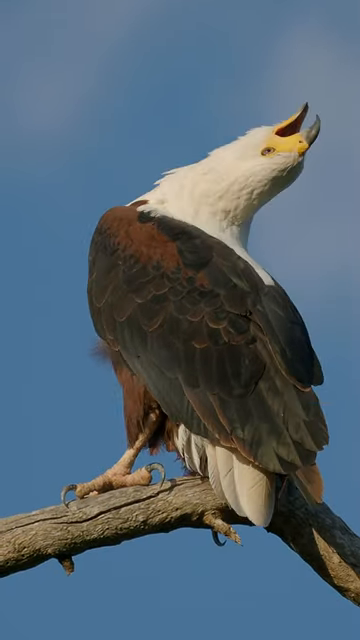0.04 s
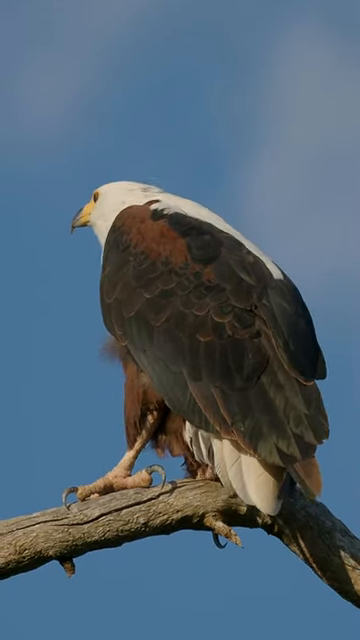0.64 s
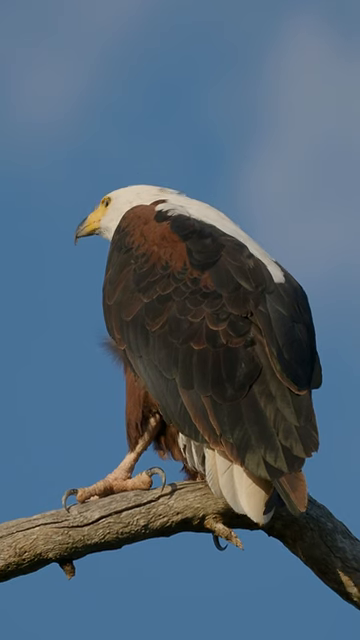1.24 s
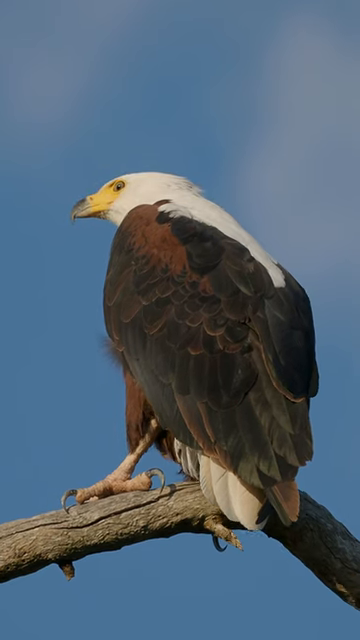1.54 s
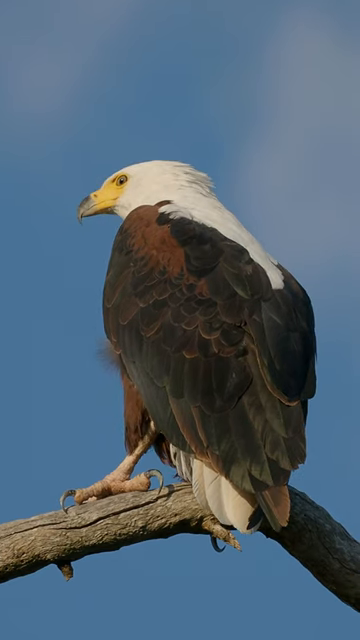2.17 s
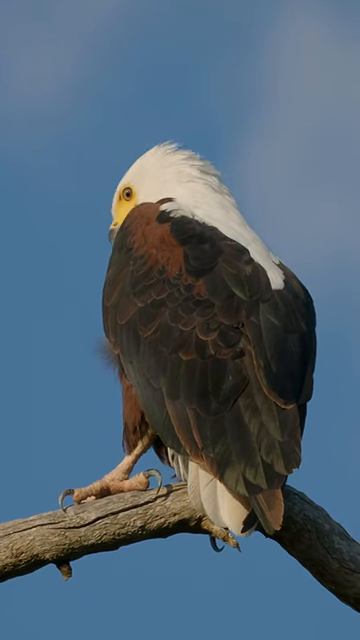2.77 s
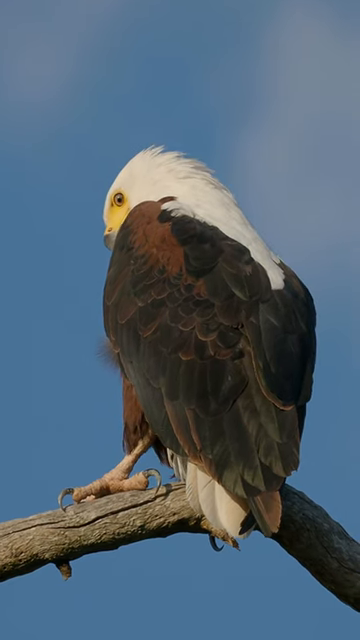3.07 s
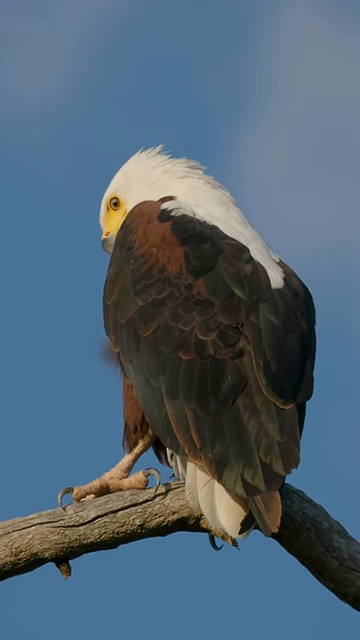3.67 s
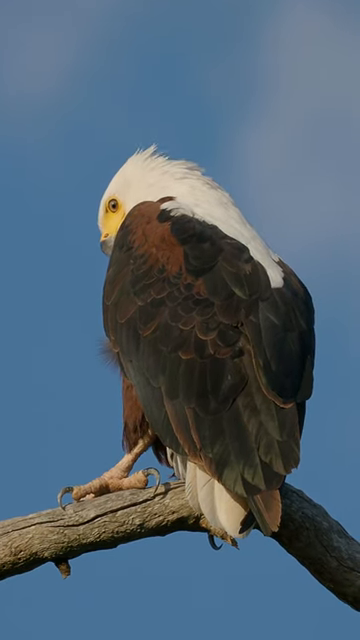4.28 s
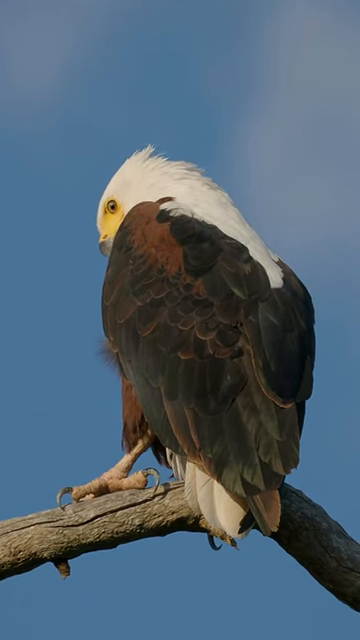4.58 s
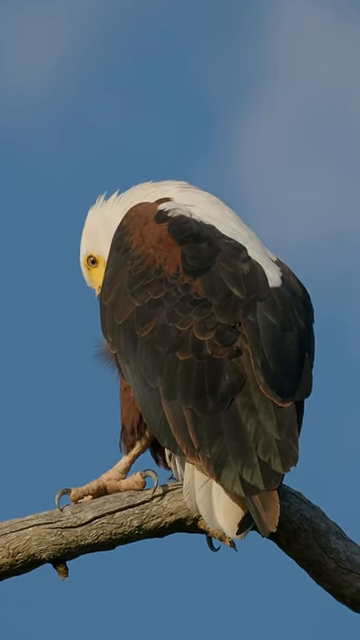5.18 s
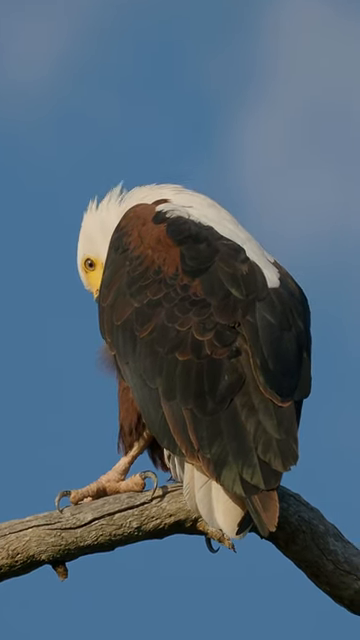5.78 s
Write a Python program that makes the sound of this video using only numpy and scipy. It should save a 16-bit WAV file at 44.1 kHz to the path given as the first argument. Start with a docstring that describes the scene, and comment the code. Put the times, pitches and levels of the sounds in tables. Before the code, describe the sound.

One loud, echoing eagle yelp and fast high chirping, followed by distant whistles and buzzy bird notes over shrill insects.

```python
"""A small bird nearby repeats a sharp two-part chirp about eight times a second, over shrill insects,
the faint hush of open air and the fading echo of an eagle's call. Almost at once the fish eagle throws
back its head and gives one loud yelp, which overloads the microphone and dies away among the trees.
As the chirping ends, a farther bird follows with three rising whistles and a row of buzzy notes.
The voices are gliding tones that scatter off trunks and leaves; insects and air are filtered noise."""
import sys
import numpy as np
from scipy import signal
from scipy.fft import rfft, irfft
from scipy.io import wavfile

SR = 44100
rng = np.random.default_rng(int(sys.argv[2]) if len(sys.argv) > 2 else 0)


def pcm_store(signal):
    """Save signal as 16-bit PCM."""
    levels = np.round(np.clip(np.atleast_2d(signal), -1, 1) * 32767)
    wavfile.write(sys.argv[1], SR, levels.astype(np.int16).T)


N = 261072
T = np.arange(N) / SR


def from_db(db):
    """Turn decibels into a number to multiply a sound by."""
    return 10 ** (np.asarray(db) / 20)


def rms_one(x):
    """Scale a sound so that its average power is 1."""
    return x / np.sqrt(np.mean(x ** 2) + 1e-20)


def along(rows, at):
    """Look up places in a table's first column and read the other columns, blending between rows."""
    first, *columns = np.transpose(rows)
    return [np.interp(at, first, column) for column in columns]


def band(x, low_hz, high_hz):
    """Keep mainly the sound between two frequencies."""
    edges_hz = [low_hz, min(high_hz, .48 * SR)]
    return signal.sosfilt(signal.butter(2, edges_hz, "band", fs=SR, output="sos"), x)


def drift(rate_hz):
    """A smooth random wander, about 1 in size; a higher rate wanders faster."""
    r = np.exp(-2 * np.pi * rate_hz / SR)
    return rms_one(signal.lfilter([1], [1, -2 * r, r * r], rng.standard_normal(N + SR))[SR:])


def tremor(count):
    """The unsteadiness of a small bird's voice, changing about every millisecond."""
    points = rng.standard_normal(count // 40 + 2)
    return np.interp(np.arange(count) / 40, np.arange(len(points)), points)


def sine(hz):
    """A pure tone of power 1 that follows a changing pitch."""
    return np.sqrt(2) * np.sin(2 * np.pi * np.cumsum(hz) / SR)


def two_ears(common, opposite, alike):
    """Mix two noises into left and right; alike runs from 0 (unrelated) to 1 (the same)."""
    return np.sqrt(1 + alike) * common + np.sqrt(1 - alike) * opposite * [[1], [-1]]


def stereo_noise(spectrum):
    """Noise shaped by (frequency [Hz], level [dB]) rows; the ears differ most in the treble."""
    # how alike the two ears are: (frequency [Hz], likeness [0 to 1])
    likeness = [(30, 1), (100, .2), (250, 0.9), (600, 0.4), (1500, 0.56), (3000, 0.17), (8000, 0),
                (16000, 0)]
    log_hz = np.log(np.fft.rfftfreq(N, 1 / SR) + 1)
    level_db, = along([(np.log(hz), db) for hz, db in spectrum], log_hz)
    alike, = along([(np.log(hz), share) for hz, share in likeness], log_hz)
    below = np.maximum(np.log(spectrum[0][0]) - log_hz, 0)
    above = np.maximum(log_hz - np.log(spectrum[-1][0]), 0)
    common, opposite = rfft(rng.standard_normal((2, N))) * from_db(level_db - 60 * (below + above))
    return rms_one(irfft(two_ears(common, opposite, alike), N))


def place(x, pan_db, lag_ms):
    """Give a sound a direction: a positive pan is louder on the left, a positive lag later on the right."""
    delay = np.exp(-2j * np.pi * np.fft.rfftfreq(N, 1 / SR) * lag_ms / 1000)
    right = irfft(rfft(x) * delay, N)
    return np.array([x * from_db(pan_db / 2), right * from_db(-pan_db / 2)])


def trees(x, fade_s, alike, build_s):
    """Trunks and leaves scatter a sound into a tail that builds up, then drops 60 dB in fade_s."""
    t = T[:SR * 2]
    build_up = 1 - np.exp(-(t / build_s) ** 2)
    common, opposite = rng.standard_normal((2, len(t))) * from_db(-60 * t / fade_s) * build_up
    tail = rms_one(two_ears(common, opposite, alike)) / np.sqrt(len(t))
    return signal.fftconvolve(x[None], tail, axes=1)[:, :N]


def chirp_train():
    """The chirps slow down and drop a little in pitch; gives each one's start, pitch and two levels."""
    # how hard the bird sings: (time [s], level [dB])
    effort = [(0, -19.5), (.35, -16), (.75, -15.5), (1.2, -19.5), (2.0, -19), (2.25, -17.5)]
    gap_s, gap_growth_s = .11621, .000232
    k = np.arange(20)
    start_s = .0052 + gap_s * k + gap_growth_s * k * (k - 1) / 2
    hz = 7083 - 62 * start_s
    pip_db, = along(effort, start_s)
    swoop_db = -18 + .55 * (pip_db - pip_db.mean())  # the swoop only partly follows the effort
    return np.transpose([start_s, hz, pip_db, swoop_db])


def chirp_part(shape, start_s, hz, db, rough):
    """One whistled sweep, sung from a set pattern with slight changes and a fast tremble."""
    out = np.zeros(N)
    at = np.flatnonzero((T > start_s + shape[0][0]) & (T < start_s + shape[-1][0]))
    share, level_db = along(shape, T[at] - start_s)
    pitch = hz * share * (1 + rng.normal(0, .0038) + rough * tremor(len(at)))
    out[at] = from_db(db + level_db) * (sine(pitch) + from_db(-34) * sine(2 * pitch))
    return out


def near_bird():
    """A soft tick, a high pip that plunges with a thin rasp, then a rising swoop, over and over."""
    # the four parts of a chirp: (time from its start [s], pitch [share of the chirp's], level [dB])
    tick = [(-.025, .44, -42), (-.0225, .5, -31), (-.02, .49, -27.5), (-.018, .42, -22),
            (-.015, .35, -26.5), (-.011, .34, -41)]
    pip = [(-.0012, .87, -24), (-.0003, .94, -6), (.002, .99, -1), (.0064, 1.008, 0), (.010, 1.02, -12),
           (.0123, 1.005, -1), (.0135, .78, .5), (.0147, .56, -17), (.0175, .38, -38)]
    rasp = [(.003, 1.05, -42), (.0105, 1.13, -20), (.013, 1.17, -25), (.016, 1.06, -21), (.021, 1.1, -24),
            (.034, 1.08, -37)]
    swoop = [(.016, .43, -35), (.018, .57, -19), (.0197, .72, -4.5), (.0225, .745, -1), (.0275, .782, 1.8),
             (.031, .808, -2), (.034, .82, -10), (.038, .82, -35)]
    chirps = chirp_train()
    pips = sum(chirp_part(pip, s, hz, db, rough=.004) for s, hz, db, _ in chirps)
    swoops = sum(chirp_part(swoop, s + rng.normal(0, .0004), hz, db, rough=.006)
                 for s, hz, _, db in chirps)
    rasps = sum(chirp_part(rasp, s, hz, db, rough=.045) for s, hz, db, _ in chirps)
    ticks = sum(chirp_part(tick, s, hz, db=rng.normal(-17.5, 1.5), rough=.15) for s, hz, _, _ in chirps)
    direct = from_db(-2.5) * place(pips, pan_db=-9.5, lag_ms=.057)
    direct += from_db(2.5) * place(swoops, pan_db=-1.4, lag_ms=.058)
    # the harsh parts blur into scratches among the nearest leaves
    scratches = trees(ticks, fade_s=.018, alike=.25, build_s=.001)
    scratches += from_db(-5.5) * trees(rasps, fade_s=.012, alike=.11, build_s=.001)
    song = pips + swoops + ticks + rasps
    leaves = from_db(-6) * trees(song, fade_s=.08, alike=.1, build_s=.006)
    woods = from_db(-18) * trees(song, fade_s=.64, alike=.1, build_s=.02)
    return direct + scratches + leaves + woods


def shrill(hz, width_hz):
    """Noise squeezed into a band so narrow that it becomes a wavering tone, different in each ear."""
    low_hz, high_hz = hz - width_hz / 2, hz + width_hz / 2
    noise = rng.standard_normal((2, N))
    return rms_one(band(band(noise, low_hz, high_hz), low_hz, high_hz))


def insects():
    """Many wings ring near one pitch and merge into a throbbing band; a nearer singer suddenly stops."""
    # the far chorus: (pitch [Hz], width [Hz], level [dB])
    chorus_bands = [(5404, 200, -3), (5610, 310, -1.5), (5797, 170, -3.5), (5370, 1000, -14)]
    # the nearer insect's two tones: (pitch [Hz], width [Hz])
    solo_tones = [(5540, 55), (5652, 40)]
    # how loudly it sings: (time [s], level [dB])
    solo_levels = [(0, -50.5), (2.3, -46.5), (3.5, -44.5), (3.85, -44.5), (3.88, -80)]
    throb_period_s, throb_peak_s = .26, 4.05
    chorus = rms_one(sum(from_db(db) * shrill(hz, width) for hz, width, db in chorus_bands))
    solo = rms_one(sum(shrill(hz, width) for hz, width in solo_tones))
    throb_db = 1.14 * np.cos(2 * np.pi * (T - throb_peak_s) / throb_period_s)
    chorus_db = -47.6 + throb_db + .15 * drift(3)
    solo_db, = along(solo_levels, T)
    left_right_gain = from_db([[.3], [4.3]])
    return (from_db(chorus_db) * chorus + from_db(solo_db) * solo) * left_right_gain


def open_air():
    """A distant hush, a fine hiss and a light breeze rumbling on the microphone."""
    # the tone colours of the hush and the hiss: (frequency [Hz], relative level [dB])
    hush = [(25, 5.5), (60, -10.5), (120, -13), (190, -9), (280, -1), (400, -1.5), (520, -7), (700, -1),
            (860, -7), (1050, -2), (1450, -1.5), (1750, -10), (2100, -14.5), (3000, -5)]
    hiss = [(2000, -10.5), (3200, 0.5), (4500, -9.5), (7000, -7), (9000, -9.5), (12000, -11), (15500, -7.5)]
    # puffs of wind: (time [s], half length [s], level [dB])
    gusts = [(2.39, 0.094, -65.5), (2.63, .05, -72), (4.113, 0.046, -63), (4.225, .022, -55),
             (4.6, .07, -67)]
    puffs = sum(from_db(db) * np.exp(-((T - s) / half) ** 2) for s, half, db in gusts)
    rumble = rms_one(band(rng.standard_normal((2, N)), 27, 75))
    wind = (from_db(-84.5) + puffs) * rumble
    return from_db(-54) * stereo_noise(hush) + from_db(-53) * stereo_noise(hiss) + wind


def lingering_echo():
    """An earlier yelp is still dying away in the trees."""
    # the echo's tone colour: (frequency [Hz], relative level [dB])
    colour = [(650, -24), (1000, -23), (1200, -19), (1390, -3), (1520, -19.5), (1750, -6.5),
              (1950, -36.5), (2800, -26.5), (3100, -35)]
    fade_s = 1.2
    return stereo_noise(colour) * from_db(-31.5 - 60 * T / fade_s)


def hoarse_voice():
    """Short rough glides that swell and break off, at the start and end of the eagle's yelp."""
    # croaks: (start [s], length [s], start pitch [Hz], end pitch [Hz], bend of the glide [1 is straight],
    # level [dB], overtone boost [dB])
    croaks = [(.075, .056, 728, 1075, 2.8, -13.5, 3), (.312, .022, 1120, 819.6, 1.1, -23.5, -7)]
    # the tones in a croak: (multiple of the pitch, level [dB])
    harmonics = [(1, 0), (2, -17), (3, -23), (4, -40)]
    out = np.zeros(N)
    pitch_wobble = 1 + .015 * drift(246.5)
    level_wobble = from_db(drift(120))
    for s, length, start_hz, end_hz, bend, db, boost_db in croaks:
        at = np.flatnonzero((T > s) & (T < s + length))
        progress = (T[at] - s) / length
        hz = (end_hz + (start_hz - end_hz) * (1 - progress) ** bend) * pitch_wobble[at]
        voice = sum(from_db(level + boost_db * (k > 1)) * sine(k * hz) for k, level in harmonics)
        out[at] += from_db(db) * np.sin(np.pi * progress ** 2) * voice
    return out * level_wobble


def clear_voice():
    """A nearly pure tone whose pitch follows the eagle's effort, then droops; gives tone and overtones."""
    # the effort, two pushes with the second the harder: (time [s], level [dB])
    effort = [(.123, -8.5), (.17, -11), (.182, -20), (0.193, -11.5), (.226, -17), (0.251, -4.5), (.274, -3),
              (.288, -8.5), (.299, 2.1), (.328, -11)]
    # the overtones: (multiple of the pitch, starting level [dB], fading [dB/s])
    overtone_levels = [(2, -21.5, 50.5), (3, -47.5, 4), (4, -60.5, 9.5), (5, -54, 30), (6, -59, 0),
                       (7, -37.5, 70)]
    yelp_hz, hz_per_db = 1443.2, 3
    attack_s, release_s, droop_from_s = .005, .006, .262
    flutter_from_s, flutters_per_s, flutter_depth = .307, 100, .7
    start, end = effort[0][0], effort[-1][0]
    effort_db, = along(effort, T)
    # at the end the pitch falls ever faster and the voice flutters as it gives out
    droop_hz = 52000 * (np.clip(T, droop_from_s, end) - droop_from_s) ** 2
    flutter = 1 - flutter_depth * np.sin(np.pi * flutters_per_s * np.maximum(T - flutter_from_s, 0)) ** 2
    hz = (yelp_hz + hz_per_db * effort_db - droop_hz) * (1 + .0012 * drift(120))
    on_off = np.interp(T, [start - attack_s, start, end, end + release_s], [0, 1, 1, 0]) ** 2
    tone = on_off * flutter * from_db(effort_db) * sine(hz)
    age_s = np.clip(T, start, end) - start
    overtones = sum(from_db(level - fade * age_s + 1.3 * (k - 1) * drift(25)) * sine(k * hz)
                    for k, level, fade in overtone_levels)
    # the overtones follow the effort only a little, and die as the pitch droops
    overtone_db = .2 * (effort_db - effort_db[0]) - .17 * droop_hz
    return tone, on_off * from_db(overtone_db) * overtones


def later(x, seconds):
    """The same sound arriving by a longer path."""
    return np.interp(T - seconds, T, x, left=0)


def eagle():
    """The voice starts hoarse, jumps up to a nearly pure tone and falls back; the trees answer."""
    # groups of trees that send the yelp back: (delay [s], level [dB])
    tree_groups = [(.135, -27.5), (.185, -33.5)]
    tone, overtones = clear_voice()
    body = tone + hoarse_voice()
    direct = place(body, pan_db=-.3, lag_ms=-.05) + place(overtones, pan_db=-4.5, lag_ms=-.05)
    carried = band(body + overtones, 1150, 2800)  # distant trees send back mostly the main tone
    far = from_db(-28.5) * trees(carried, fade_s=1.8, alike=.64, build_s=.02934)
    echoes = sum(from_db(db) * trees(later(carried, delay), fade_s=.17, alike=.6, build_s=.015)
                 for delay, db in tree_groups)
    near = from_db(-17) * trees(body, fade_s=.17, alike=.1, build_s=.008)
    return direct + far + echoes + near


def glides(notes):
    """Whistled notes that swell while they slide from one pitch to another."""
    song = np.zeros(N)
    for s, length, start_hz, end_hz, db, rough in notes:
        at = np.flatnonzero((T > s) & (T < s + length))
        progress = (T[at] - s) / length
        slide_hz = start_hz + (end_hz - start_hz) * np.sin(np.pi / 2 * progress)
        pitch = slide_hz * (1 + rough * tremor(len(at)))
        song[at] += from_db(db) * np.sin(np.pi * progress ** 2) * sine(pitch)
    return song


def far_birds():
    """Falling flicks, rising whistles, buzzes and peeps come through the leaves, with faint far hoots."""
    # short falling flicks, and the rising whistle that ends the far bird's song: (start [s], length [s],
    # start pitch [Hz], end pitch [Hz], level [dB], roughness [share of the pitch])
    flicks_and_last_whistle = [(2.105, 0.022, 10500, 6470, -36, 0.088),
                               (2.316, .022, 10800, 6200, -32.5, 0.11), (4.41, 0.036, 3510, 2870, -46, .06),
                               (4.461, 0.054, 3580, 2643, -44, 0.077),
                               (5.655, .021, 4600, 3840, -47, 0.043),
                               (5.674, .035, 3410, 2705, -40.5, 0.076),
                               (5.77, 0.15, 3050, 3493, -45.5, .004)]
    # a very distant bird's hoots: (start [s], level [dB])
    hoot_notes = [(2.24, -57.5), (5.29, -52), (5.38, -58.5), (5.67, -60), (5.83, -58)]
    # the three rising whistles that open the far bird's song: (start [s])
    whistle_starts = [2.442, 2.553, 2.664]
    # thin rising peeps among its buzzes: (start [s], level [dB])
    peep_notes = [(3.21, -51), (3.455, -55), (3.71, -52), (4.205, -47), (4.455, -42.5)]
    # fill these out to the same columns as the first table
    hoots = [(s, .069, 987, 987, db, .012) for s, db in hoot_notes]
    whistles = [(s, .026, 2000, 4020, -35.5, .0083) for s in whistle_starts]
    peeps = [(s, .017, 5000, 6700, db, .02) for s, db in peep_notes]
    song = buzzes() + glides(whistles + peeps + flicks_and_last_whistle)
    direct = from_db(-4) * place(song, pan_db=-4, lag_ms=.031)
    leaves = from_db(-3.5) * trees(song, fade_s=.09, alike=.2, build_s=.005)
    woods = from_db(-9.5) * trees(song, fade_s=.57, alike=.24, build_s=.016)
    return direct + (leaves + woods) * from_db([[-1.2], [1.2]]) + glides(hoots)


def buzzes():
    """Notes that leap up from a low start and warble so fast that they buzz, steadying as they end."""
    # the notes, mostly stepping down: (start [s], length [s], pitch after the leap [Hz], end pitch [Hz],
    # warble depth [share of the pitch], level [dB])
    notes = [(2.778, 0.14, 5170, 4920, 0.16, -39), (3.088, .157, 4804, 4390, 0.11, -35.4),
             (3.402, .168, 4886, 4397, .12, -36), (3.718, .14, 4660, 4080, 0.13, -37),
             (4.018, .15, 4770, 4130, 0.17, -36), (4.34, 0.16, 4575, 3970, 0.182, -36.5),
             (4.685, .15, 4515, 3820, .19, -39), (4.989, 0.17, 3540, 3355, .14, -42.5),
             (5.318, .174, 3043, 3220, 0.15, -45.5), (5.633, 0.2, 2883, 3246, 0.16, -44.5)]
    # the course of one note: (progress [0 to 1], level [dB], warble [share of its depth])
    shape = [(0, -20.5, 0.66), (.16, -7.5, 0.99), (.3, -1.5, 0.95), (.55, -3, 0.81), (.8, 1.5, 0.42),
             (.9, -0.5, 0.18), (1, -28, 0.11)]
    leap_from_hz = 1450
    song = np.zeros(N)
    for s, length, top_hz, end_hz, depth, db in notes:
        at = np.flatnonzero((T > s) & (T < s + length))
        t, into_song_s = T[at] - s, s - notes[0][0]
        # the leap and the warble grow lazier as the song goes on
        leap_s = .036 + .007 * into_song_s
        warbles_per_s = 71 - 3.98 * into_song_s
        level_db, warble = along(shape, t / length)
        centre_hz = np.interp(t, [0, .6 * leap_s, leap_s, length],
                              [leap_from_hz, .8 * top_hz, top_hz, end_hz])
        cycle = 2 * np.pi * np.cumsum(warbles_per_s * (1 + .243 * tremor(len(at)))) / SR + np.pi
        # each warble flicks up briefly, is loudest on its way down and lingers at the bottom
        swing = np.sin(cycle) - .15 * np.cos(2 * cycle)
        pitch = centre_hz * (1 + warble * (depth * swing + .033 * tremor(len(at))))
        throb_db = -4 * warble * np.cos(cycle - .3)
        swell_db = (1.5 + .2 * into_song_s) * (t / length - .5)
        song[at] += from_db(db + level_db + throb_db + swell_db) * sine(pitch)
    return song


def scene():
    """Everything heard from below the eagle's branch."""
    return eagle() + lingering_echo() + near_bird() + far_birds() + insects() + open_air()


def record(dry):
    """The microphone overloads, flattening the loudest peaks, and the highest treble is cut."""
    cutoff_hz = 15900
    clipped = np.clip(dry, -1, 1)
    return signal.sosfilt(signal.ellip(10, .1, 70, cutoff_hz, fs=SR, output="sos"), clipped)


dry = scene()
out = record(dry)
pcm_store(out)
```